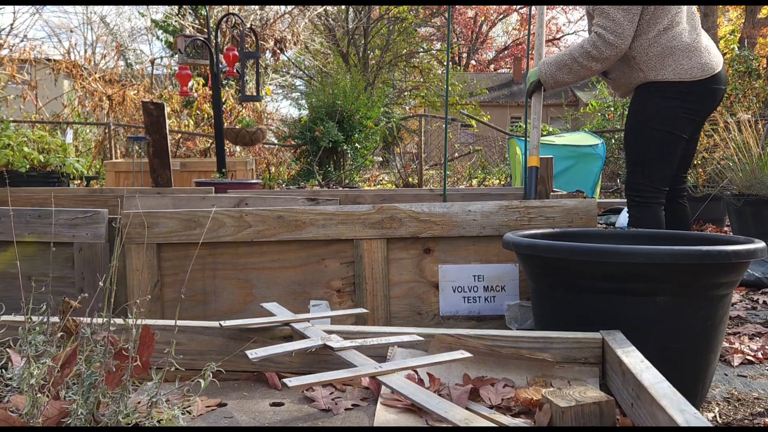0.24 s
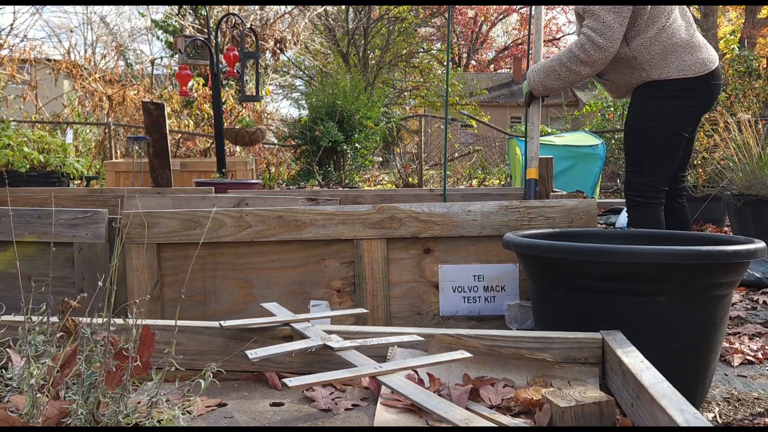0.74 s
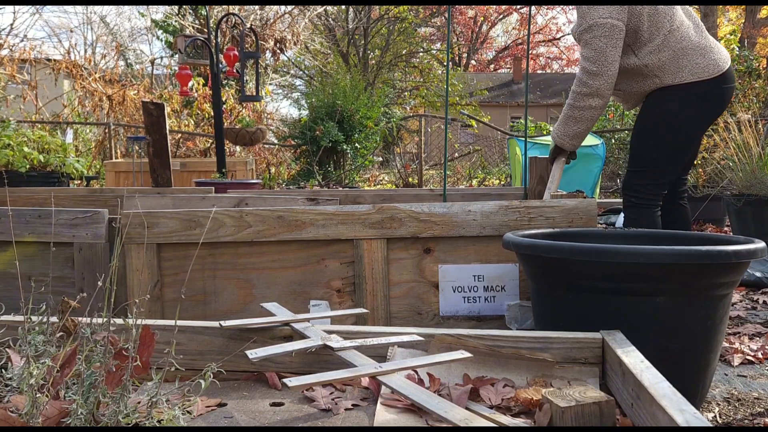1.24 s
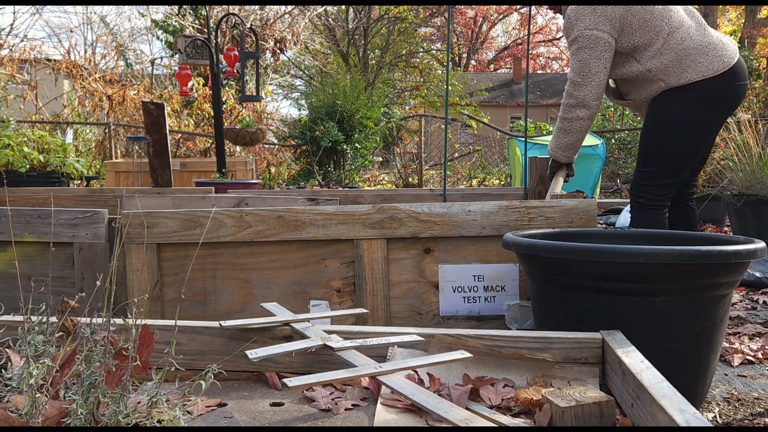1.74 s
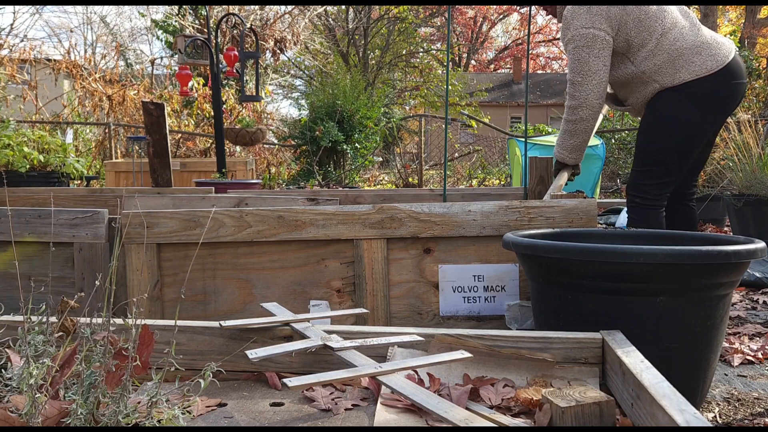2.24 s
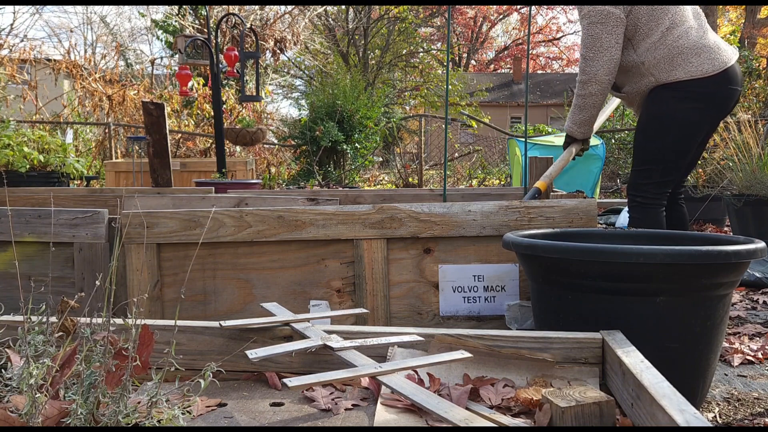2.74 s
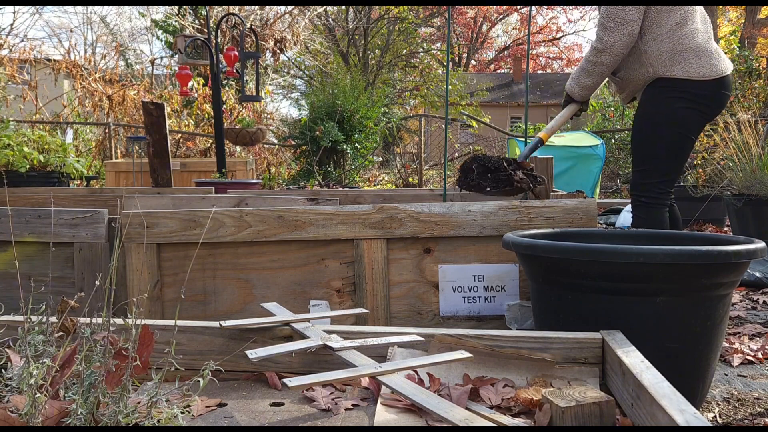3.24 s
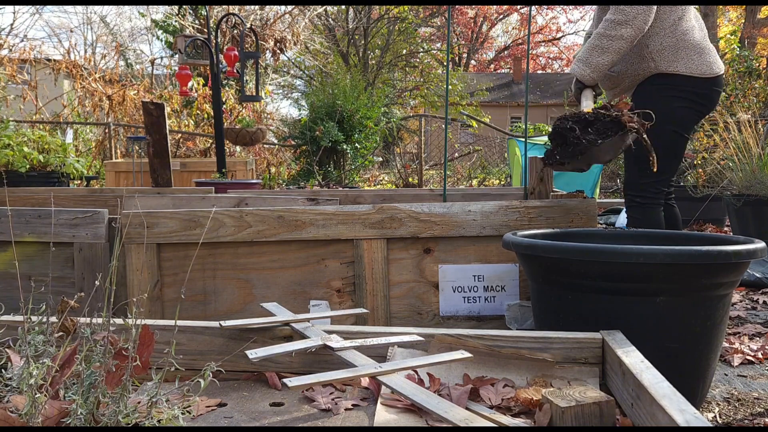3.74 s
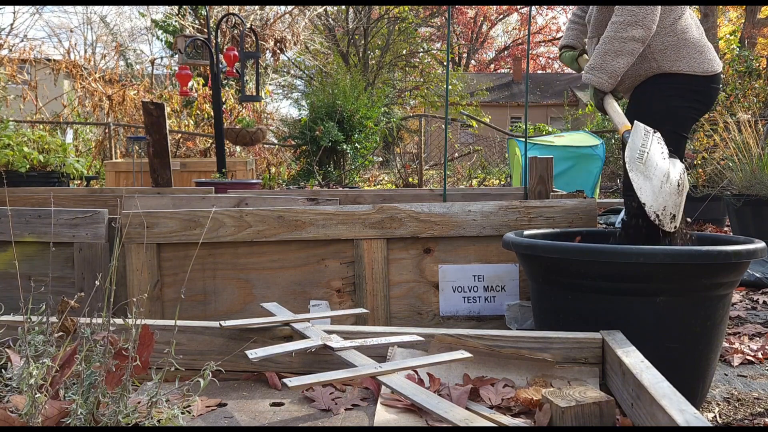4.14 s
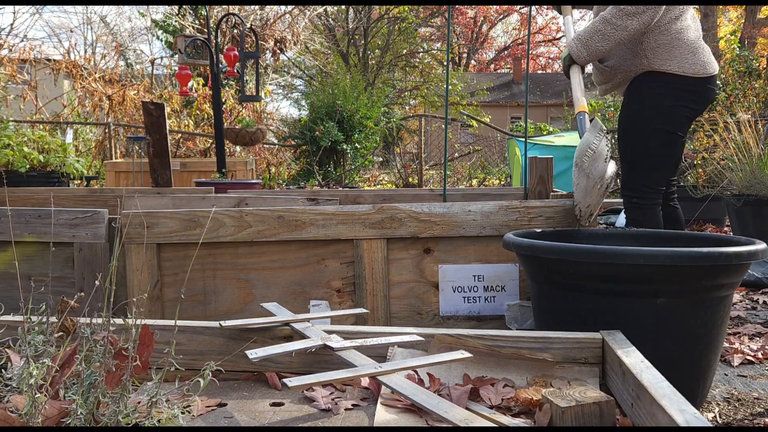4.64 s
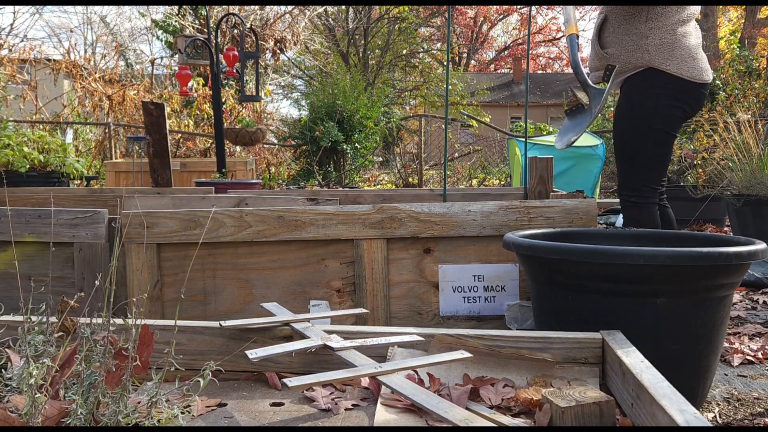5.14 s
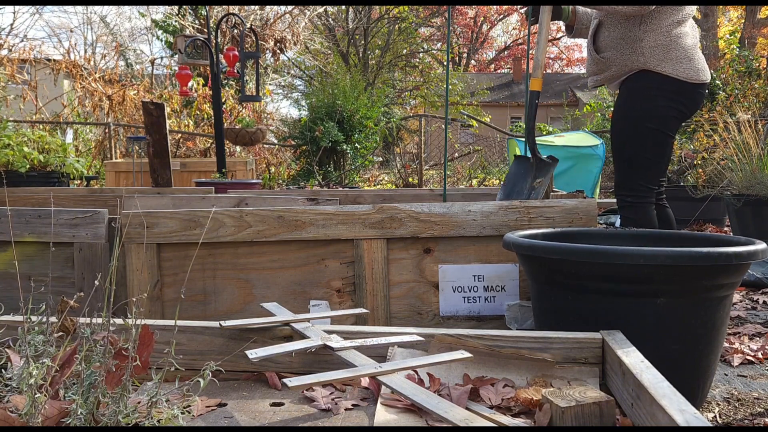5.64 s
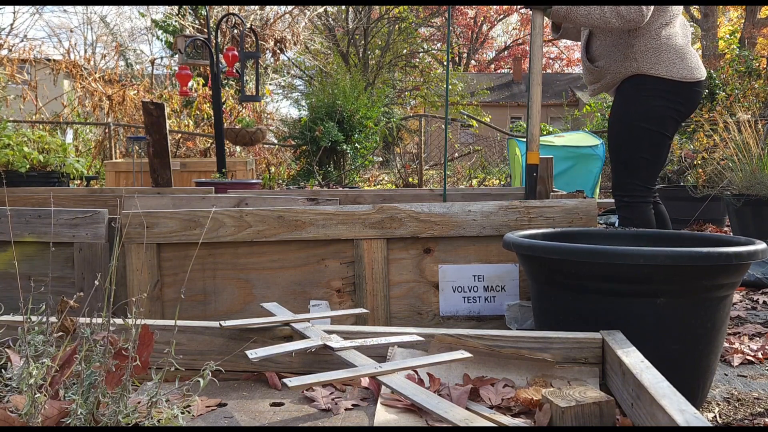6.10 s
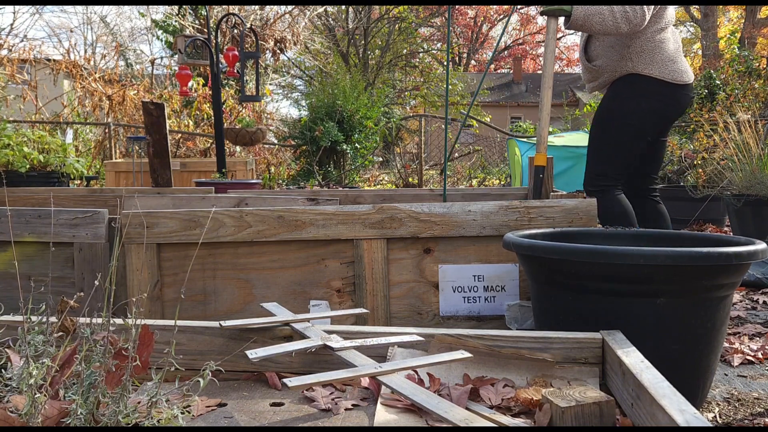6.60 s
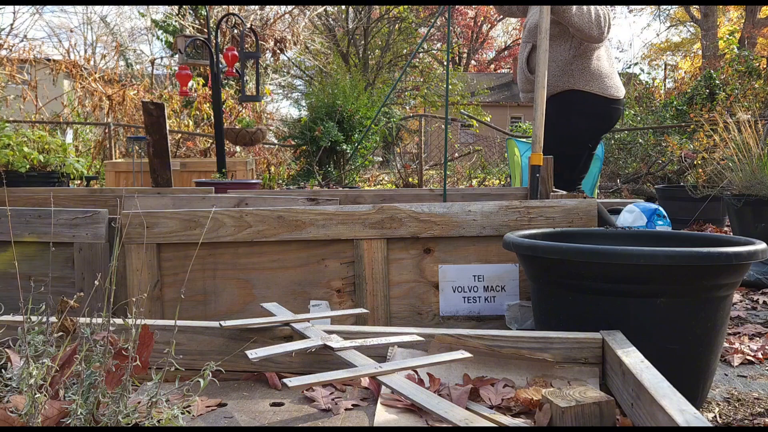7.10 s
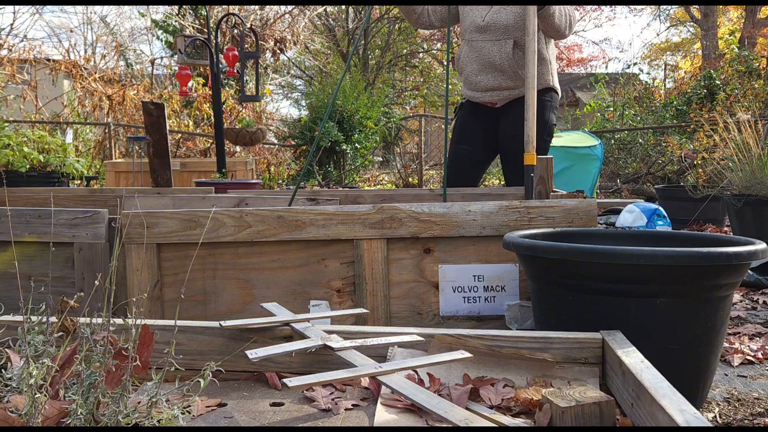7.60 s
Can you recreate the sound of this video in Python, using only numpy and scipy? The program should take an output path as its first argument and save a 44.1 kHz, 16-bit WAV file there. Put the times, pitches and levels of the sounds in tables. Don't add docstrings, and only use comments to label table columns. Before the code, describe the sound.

A shovel knocks wooden planks, thuds hard in soil, tips dirt into a plastic pot, rings twice on its rim, then leaves crunch.

```python
import sys
import numpy as np
from scipy import signal
from scipy.fft import rfft, irfft, next_fast_len
from scipy.io import wavfile
from scipy.ndimage import uniform_filter1d

SR = 44100
rng = np.random.default_rng(int(sys.argv[2]) if len(sys.argv) > 2 else 0)


def voltage_ratio(decibels):
    exponent = np.asarray(decibels, float) / 20
    return 10 ** exponent


def pcm_store(signal):
    levels = np.round(np.clip(np.atleast_2d(signal), -1, 1) * 32767)
    wavfile.write(sys.argv[1], SR, levels.astype(np.int16).T)


N = 346626

# hz, level_db, t60_s
PLANK_MODES = [(169, -12, 0.11), (244, 7.5, 0.19), (337.6, 7, 0.17), (415, 3, 0.047), (505, 3, 0.072),
               (650, 2, 0.1), (728, -16, 0.15), (894, -8, 0.08), (954, -7.5, 0.056), (1270, -11, 0.011),
               (1250, -28, 0.056), (1517, -30, 0.089), (1880, -17, 0.1)]
# start_s, peak_db, brightness_db_per_octave, pitch_factor
KNOCKS = [(0.0382, -33.5, -1.5, 1.0), (0.2685, -17, 2, 1.02), (0.3621, -27.5, -4, 1.03),
          (0.4153, -35, 5, 0.97), (0.469, -44, 0, 0.94), (0.63, -43, -1, 0.56), (0.757, -42.5, 3, 1.56),
          (1.9858, -25, -3, 1.1), (4.612, -25.5, 2, 1.06), (5.893, -39, 12, 0.87), (7.809, -38, 2, 1.07)]
RING_FACTOR, RING_LOSS_PER_DB = 0.89, 0.032
BLOW_S, BLOW_REF_DB, STIFFEN = 0.007, -19, 0.25
SOIL_DB, JOLT = -7, 2.5

# start_s, level_db, pitch_hz, contact_s, onset_softness
THUDS = [
    (2.2757, -19, 109, 0.023, .99),
    (2.277, -31, 260, 0.009, 1),
    (4.6168, -20, 114, 0.013, .99),
    (1.5, -48, 105.7, 0.018, 0.61),
    (.2695, -31, 280, 0.024, 0.52),
    (.3615, -26.5, 303, 0.034, 0.19),
]
# start_s, level_db, pitch_hz, contact_s, onset_softness
SLAM = (1.9866, -6.3, 114, .0187, .52)
# start_s, level_db, pitch_hz, length_s, onset_softness
CHIRP = (.917, -52, 7400, .024, 1)
# hz, level_db, t60_s
SLAM_RING = [(332, -12.5, .055), (496, -18, .037), (650, -17.5, .03)]
# hz, peak_db, t60_s
SLAM_CRACKS = [(740, -39, 0.023), (1100, -31.5, 0.037), (1500, -41, 0.04), (2060, -40.5, 0.05),
               (4500, -46, 0.036), (7700, -37.5, 0.023)]
CONTACT_S = .001

# start_s, ring_db, crunch_db, crunch_s, rattle_db
BLOWS = [
    (4.6105, -29.5, -33, 0.014, -47),
    (4.8187, -37, -39.5, 0.016, -60),
]
# delay_s, level_db
BOUNCES = [(.0088, -7), (.0119, -1)]
# hz, first_blow_db, second_blow_db, t60_s
BLADE_MODES = [(809, -9.5, -13, .55), (1373, -15, -40, .19), (1577, -13, -32, .42), (1846, -21, -19, .35),
               (2015, -17, -9, .4), (2433, -14, -36, .27), (2511, -9.5, -30, .36), (10400, -31, -50, .25),
               (1450, -4, -32, 0.039), (1530, -8, -36, 0.04), (1690, -10, -6, 0.045), (2060, -11, -9, 0.06),
              (2210, -16, -3, 0.036), (2700, -15, -20, 0.06), (2826, -24, -28, 0.23),
              (3435, -26, -26, 0.24), (3800, -28, -22, 0.08), (4830, -27, -24, 0.05),
              (6300, -26, -19, 0.05), (7300, -17, -22, .09), (11780, -35, -40, .2), (13140, -32, -40, .06)]
# from_hz, to_hz, first_blow_db, second_blow_db, t60_s
BLADE_CROWD = (1305, 2905, -31, -44, 0.2)
# hz, density_db_per_hz
CRUNCH_TONES = [
    [(530, -38), (900, -13), (1120, -28), (1470, -6.5), (2120, -8), (2540, -11), (3040, -22), (5160, -13.5),
     (6250, -15), (7230, -11), (8450, -24.5), (13200, -24.5), (16000, -24)],
    [(710, -38), (1300, -40), (2150, -9), (3590, -8), (4960, -1.5), (7410, -4), (8170, -19), (9510, -18),
     (10300, -42), (11200, -30), (16000, -32)],
]
CLICK, GRIND, GRIND_S = 9, .05, .045
DAMP_S, DAMP_DB = .12, -7

# hold_start_s, level_db, attack_s, hold_s, release_s
SHAKE = [(.425, -45, 0.028, 0.067, 0.046), (.64, -49.5, 0.023, 0.021, 0.091), (.76, -56.5, .03, 0.022, .15)]
SLIDE = [(2.255, -50.5, .1, 0.13, 0.092)]
SPRAY = [(4.18, -56.5, .016, .008, 0.05), (4.225, -58, 0.044, 0.072, 0.064)]
CLODS = [(4.21, -51.5, .06, .04, 0.087), (4.285, -54.5, .04, .05, 0.057)]
# hz, density_db_per_hz
SHAKE_TONE = [(120, -35), (200, -14), (330, 9.5), (500, -6.5), (800, -7.5), (1100, -27), (1600, -22),
              (2500, -49), (5000, -90)]
SLIDE_TONE = [(240, -16), (400, -4), (579, -2.5), (742, -10), (1310, -11), (2090, -16), (3260, -11),
              (5250, -11.5), (5650, -2.5), (6100, -16), (7250, -7), (8370, -17), (15300, -22.5),
              (16000, -28)]
SPRAY_TONE = [(4120, -28), (7000, 1), (7530, 0), (9790, -23), (10400, -14), (12900, -2), (15000, -5),
              (16000, -21)]
POT_TONE = [(180, -37), (300, -8), (332, -26), (569, -3.5), (758, -9.5), (1530, -11.5), (1670, -22),
            (2090, -12.5), (3210, -20), (6000, -14), (7800, -40), (13200, -120)]
EDGE_DB = -15

# peak_s, fizz_db, crunch_db, attack_s, release_s
STEPS = [(.474, -73, -66, .3, 0.091), (.93, -59, -59, 0.03, 0.077), (1.24, -68.5, -82, 0.14, 0.18),
         (5.86, -72, -60.5, 0.081, 0.062), (5.99, -68, -58.5, 0.15, .08), (6.15, -81, -59, 0.16, 0.29),
         (6.76, -68, -56, 0.39, 0.25), (6.92, -66.5, -57, 0.14, 0.15), (7.06, -77, -59.5, 0.046, 0.081),
         (7.19, -68, -59, .15, 0.08), (7.31, -84, -55.5, 0.024, 0.34), (7.48, -60, -49.5, 0.29, 0.13),
         (7.675, -62.5, -56, .12, 0.077), (7.83, -68, -64, 0.045, 0.033)]
# hz, density_db_per_hz
LEAF_TONE = [(150, -37), (250, -5), (369, 2), (470, -1), (518, -2.5), (716, -8.5), (991, -12), (1370, -6.5),
             (1580, -21), (2160, -8), (2930, -17), (4400, -14), (7380, -12.5), (8400, -27), (12000, -29),
             (15600, -64), (22000, -120)]
TREAD_S = .03
# start_s, peak_db, pitch_hz
SNAPS = [(0.039, -45, 1270), (.27, -50, 1970), (.365, -46, 1380), (.37, -45, 950), (.416, -50, 1500),
         (.416, -52, 800), (0.956, -45, 2500), (.956, -37, 6600), (4.170, -52, 12000), (4.1795, -36, 11900),
         (4.19, -50, 13500), (4.2157, -50, 12500), (4.2326, -38, 13000), (4.258, -50, 12000),
         (4.274, -52, 12500), (4.3698, -53, 12000), (4.179, -51, 900), (4.214, -44, 1210),
         (4.219, -44, 650), (4.235, -47, 900), (4.281, -48, 1100), (4.31, -49, 1100), (4.326, -53, 1100),
         (4.376, -47, 1100), (4.819, -41, 14500), (4.819, -47, 11500), (4.829, -55, 13000),
         (5.895, -45, 1590), (6.139, -49.5, 1370), (6.765, -42, 6710), (7.05, -53, 10000),
         (7.2968, -38, 5260), (7.296, -47, 990), (7.349, -48, 1090), (7.353, -49, 600), (7.378, -47, 600),
         (7.388, -44, 3000), (7.396, -39, 6500), (7.395, -46, 1000), (7.4145, -42, 6450),
         (7.415, -49, 1000), (7.431, -38, 5200), (7.44, -56, 1400), (7.454, -35, 6500), (7.465, -37, 2150),
         (7.465, -44, 1100), (7.483, -33.5, 5000), (7.491, -40, 990), (7.492, -39, 4700),
         (7.506, -41, 5000), (7.514, -46, 1000), (7.516, -39, 4700), (7.518, -40, 10000),
         (7.655, -50, 5050), (7.806, -42, 2800), (7.805, -39.5, 1010)]
SNAP_T60_S, SNAP_T60_CYCLES = .006, 36
POT_START_S, POT_END_S, WALK_S = 4.0, 5.0, 6.5
POT_WET_DB = -8

# time_s, level_db
HUM = [(0, -48), (.35, -35), (.72, -41), (1, -54), (2.6, -49.5), (3.3, -41), (5.3, -38), (5.95, -41),
       (6.5, -45.5), (7.2, -48), (7.86, -45.5)]
HUM_HZ, SAG_HZ_PER_S = 102.3, .9
# hz, level_db, width_hz
FAINT_HUMS = [(70.87, -46, 3.6), (131.9, -56, 2.9), (183.5, -59, 5.3)]

# hz, density_db_per_hz
TRAFFIC_TONE = [(12, -31), (20, -25), (43, -6), (58, 3.5), (81, -6.5), (102, -0.5), (166, -13),
                (189, -15.5), (211, -22.5), (244, -21.5), (295, -26.5), (381, -21), (426, -31), (687, -31),
                (900, -55), (1170, -80), (1980, -120)]
# time_s, rumble_db
SWELL = [(0, -38.5), (1.6, -40.5), (2.1, -39), (2.65, -42), (4.0, -40), (4.55, -39.5), (6.15, -42),
         (7.86, -41.5)]
DEEP_DB, DEEP_DB_PER_S = 6.5, -1.5
# hz, density_db_per_hz
HISS_TONE = [(470, -11.5), (800, -0.5), (942, -2.5), (1020, -3), (1140, -5), (2150, -5), (2840, -8),
             (4630, -7.5), (5110, -10), (6820, -12.5), (7360, -8.5), (8990, -22), (10200, -27),
             (15000, -26), (16000, -33)]
HISS_DB = -56
# hz, all_round_likeness, far_left_likeness
LIKENESS = [(30, 0.87, .03), (60, 1, 0.046), (131, 0.99, 0.038), (250, 0.83, 0.075), (400, 0.62, 0.48),
            (820, 0.23, 0.72), (1500, 0.0079, 0.36), (3000, .01, 0.032), (6000, 0.0092, 0.042),
            (12000, .01, .02)]
LEFT_LEAD_S = 21.3 / 44100
# hz, left_minus_right_db
PORTS = [(60, .6), (300, .3), (1500, 1.5), (3000, 1.2), (6000, -1), (8200, -2), (9600, 6.5), (12000, 3.5),
         (15000, 3.2)]
EDGE_HZ = 15830


def evened(x):
    return x / np.sqrt(np.mean(x ** 2) + 1e-20)


def read(points, hz, column=1):
    table = np.transpose(points)
    return np.interp(np.log(hz + 1), np.log(table[0] + 1), table[column])


def add(mix, start_s, sound):
    part = mix[round(start_s * SR):][:len(sound)]
    part += sound[:len(part)]


def colour(x, spectrum):
    size = next_fast_len(len(x) + 2048)
    gain = voltage_ratio(read(spectrum, np.fft.rfftfreq(size, 1 / SR)))
    return irfft(rfft(x, size) * gain, size)[:len(x)]


def ring(force, hz, t60_s):
    t = np.arange(round(min(t60_s, .6) * SR)) / SR
    return signal.oaconvolve(force, voltage_ratio(-60 * t / t60_s) * np.sin(2 * np.pi * hz * t))


def knock(peak_db, bright_db, ring_factor, pitch, blow_s):
    u = np.arange(round(.06 * SR)) / SR / blow_s
    jolts = uniform_filter1d(rng.standard_normal(len(u)), size=16)
    blow = (1 - np.exp(-u * 15)) * np.exp(-u * 1.7) * jolts + JOLT * np.exp(-u * 40)
    modes = [(hz * pitch, db + bright_db * np.log2(hz / 300), t60_s * ring_factor)
             for hz, db, t60_s in PLANK_MODES]
    soil_tone = [(100, -40, 0)] + modes + [(3000, -71, 0)]
    soil = evened(colour(rng.standard_normal(len(u)), soil_tone))
    out = np.zeros(SR // 4)
    add(out, 0, voltage_ratio(SOIL_DB) * soil * (1 - np.exp(-u * 8)) * np.exp(-u * 0.19))
    for hz, db, t60_s in modes:
        swing = ring(blow, hz, t60_s)
        add(out, 0, voltage_ratio(db) * swing / abs(swing).max())
    return voltage_ratio(peak_db) * out / abs(out).max()


def thud(level_db, hz, contact_s, softness):
    t = np.arange(0, contact_s, 1 / SR)
    press = np.sin(np.pi * (t / contact_s) ** softness) ** 2
    return voltage_ratio(level_db) * press * np.sin(2 * np.pi * hz * t)


def slam():
    contact = signal.windows.hann(round(CONTACT_S * SR))
    out = np.zeros(SR // 8)
    add(out, CONTACT_S / 2, -thud(*SLAM[1:]))
    for hz, db, t60_s in SLAM_RING:
        add(out, 0, voltage_ratio(db) * ring(contact / contact.sum(), hz, t60_s))
    return SLAM[0] - CONTACT_S / 2, out


def clang(which, ring_db, crunch_db, crunch_s, rattle_db, bounce_s, bounce_db):
    t = np.arange(SR // 4) / SR
    grit = evened(colour(rng.standard_normal(len(t)), CRUNCH_TONES[which]))
    out = np.zeros(SR)
    crunch = voltage_ratio(crunch_db - 150 * t) / (1 + (t / crunch_s) ** 8)
    rattle = voltage_ratio(rattle_db - 60 * t) / (1 + (t / .125) ** 8)
    add(out, 0, grit * (crunch + rattle))
    scrape = .5 * np.exp(-t / 0.0017) + GRIND * np.exp(-t / GRIND_S)
    contact = rng.standard_normal(len(t)) * scrape + CLICK * (t == 0)
    force = contact + voltage_ratio(bounce_db) * np.roll(contact, round(bounce_s * SR))
    crowd = [(hz, *BLADE_CROWD[2:]) for hz in rng.uniform(*BLADE_CROWD[:2], size=24)]
    for hz, *db, t60_s in BLADE_MODES + crowd:
        swing = ring(force, hz, t60_s)
        damping = np.clip((np.arange(len(swing)) / SR - DAMP_S) / .03, 0, 1)
        add(out, 0, voltage_ratio(ring_db + db[which] + DAMP_DB * damping) * swing / abs(swing).max())
    return out


def stroke(hold_start_s, level_db, attack_s, hold_s, release_s):
    hold_end_s = hold_start_s + hold_s
    return [(hold_start_s - attack_s, level_db + EDGE_DB), (hold_start_s, level_db),
            (hold_end_s, level_db), (hold_end_s + release_s, level_db + EDGE_DB)]


def rustle(corners, tone, grains_per_s, spread_db, smooth):
    s, db = np.transpose(corners)[:2]
    t = np.arange(s[0], s[-1], 1 / SR)[:SR // 2]
    grains = np.zeros(len(t))
    for hz in np.geomspace(300, 14000, num=10):
        hits = rng.random(len(t)) < grains_per_s / 10 / SR
        sizes = voltage_ratio(spread_db * np.minimum(rng.exponential(1, len(t)), 4))
        puffs = signal.lfilter([1], [1, -.991], sizes * hits)
        band = signal.lfilter(*signal.iirpeak(hz, 2.2, SR), puffs * rng.standard_normal(len(t)))
        grains += np.sqrt(hz) * evened(band)
    friction = smooth * rng.standard_normal(len(t))
    sound = evened(colour(evened(grains) + friction, tone))
    return s[0], voltage_ratio(np.interp(t, s, db)) * sound * signal.windows.tukey(len(t), .1)


def footfall(peak_s, fizz_db, crunch_db, attack_s, release_s):
    fizz_tone = [(200, -40), (3000, -16), (8000, -2), (14000, -6.5), (16000, -2.5)]
    timing = attack_s, TREAD_S, release_s
    start_s, fizz = rustle(stroke(peak_s, fizz_db, *timing), fizz_tone, 2500, 7.1, 1.0)
    crunch = rustle(stroke(peak_s, crunch_db, *timing), LEAF_TONE, 900, 2.0, 1.0)[1]
    return start_s, fizz + crunch


def snap(peak_db, hz, t60_s):
    n = np.arange(1500)
    puff = (rng.standard_normal(1500) + 8 * (n == 0)) * voltage_ratio(-60 * n / SR / t60_s)
    dull = signal.iirpeak(min(hz, 15000), 2.4, SR)
    out = signal.lfilter(*dull, signal.lfilter(*dull, puff))
    return voltage_ratio(peak_db) * out / abs(out).max()


def fences(x, lag_samples, wet_db, t60_s):
    t = np.arange(SR // 8) / SR
    signs = rng.choice([-1., 1.], (2, len(t)))
    hits = rng.random((2, len(t))) < 4000 / SR
    taps = signs * hits * voltage_ratio(-60 * t / t60_s) * (t > .001)
    taps = signal.sosfilt(signal.butter(2, 1100, "high", fs=SR, output="sos"), taps)
    taps *= voltage_ratio(wet_db) / np.linalg.norm(taps, axis=1, keepdims=True)
    taps[[0, 1], [lag_samples, 0]] += 1
    return signal.oaconvolve(x[None], taps, axes=1)[:, :N]


def engines():
    t = np.arange(N) / SR
    level = np.sqrt(2) * voltage_ratio(np.interp(t, *np.transpose(HUM)))
    out = level * np.sin(2 * np.pi * np.cumsum(HUM_HZ - SAG_HZ_PER_S * t) / SR)
    for hz, db, width_hz in FAINT_HUMS:
        pole = np.exp(-np.pi * width_hz / SR)
        drift = signal.lfilter([1], [1, -pole], rng.standard_normal((2, N)))
        phase = 2 * np.pi * hz * t
        out += voltage_ratio(db) * evened(drift[0] * np.sin(phase) + drift[1] * np.cos(phase))
    return np.array([out, np.roll(out, round(.0003 * SR))])


def yard(patchy_db=1.0):
    frames, hz = N // 512 + 5, np.fft.rfftfreq(2048, 1 / SR)
    a, b, c, d, patches = rng.standard_normal((frames, len(hz), 5)).T
    patches = uniform_filter1d(uniform_filter1d(patches, size=20, axis=0), size=8, axis=1)
    patches = evened(patches)
    lead = np.exp(-2j * np.pi * hz * LEFT_LEAD_S)
    same = read(LIKENESS, hz) + read(LIKENESS, hz, column=2) * lead
    same = (same / np.maximum(abs(same), 1))[:, None]
    left = a + 1j * b
    right = same * left + np.sqrt(np.clip(1 - abs(same) ** 2, 0, 1)) * (c + 1j * d)
    spectra = np.array([left, right]) * voltage_ratio(patchy_db * patches)

    def sounded(gain):
        return evened(signal.istft(spectra * gain, nperseg=2048, noverlap=1536)[1][:, :N])

    deep_db = DEEP_DB + DEEP_DB_PER_S * np.arange(frames) * 512 / SR
    deep_db = deep_db / (1 + (hz[:, None] / 60) ** 4)
    rumble = sounded(voltage_ratio(read(TRAFFIC_TONE, hz)[:, None] + deep_db))
    hiss = sounded(voltage_ratio(read(HISS_TONE, hz))[:, None])
    swell_db = np.interp(np.arange(N) / SR, *np.transpose(SWELL))
    return voltage_ratio(swell_db) * rumble + voltage_ratio(HISS_DB) * hiss


def scene():
    out = yard() + engines()
    bed, pot, path = np.zeros((3, N))

    def place(s):
        if POT_START_S < s < POT_END_S:
            return pot
        return path if s > WALK_S else bed

    for s, db, bright_db, pitch in KNOCKS:
        ring_factor = RING_FACTOR - RING_LOSS_PER_DB * bright_db
        blow_s = BLOW_S * voltage_ratio(STIFFEN * (BLOW_REF_DB - db))
        add(bed, s, knock(db, bright_db, ring_factor, pitch, blow_s))
    for s, *row in THUDS + [CHIRP]:
        add(bed, s, thud(*row))
    add(bed, *slam())
    for hz, db, t60_s in SLAM_CRACKS:
        add(bed, SLAM[0], snap(db, hz, t60_s))
    for which, (s, *row) in enumerate(BLOWS):
        add(pot, s, clang(which, *row, *BOUNCES[which]))
    # strokes, tone, grains_per_s, spread_db, smooth
    for rows, *grain in [(SHAKE, SHAKE_TONE, 600, 2.9, 1.5), (SLIDE, SLIDE_TONE, 3000, 3.0, 1.2),
                         (SPRAY, SPRAY_TONE, 3000, 3.0, 1.1), (CLODS, POT_TONE, 550, 2.4, .9)]:
        for row in rows:
            add(place(row[0]), *rustle(stroke(*row), *grain))
    for row in STEPS:
        add(place(row[0]), *footfall(*row))
    for s, db, hz in SNAPS:
        add(place(s), s, snap(db, hz, SNAP_T60_S + SNAP_T60_CYCLES / hz))
    out += fences(bed, lag_samples=2, wet_db=-2.5, t60_s=0.04)
    out += fences(pot, lag_samples=4, wet_db=POT_WET_DB, t60_s=0.03)
    out += fences(path, lag_samples=1, wet_db=-5.5, t60_s=0.04)
    return out


def top_cut(x):
    return signal.sosfilt(signal.butter(12, 15830, fs=SR, output="sos"), x)


def record(dry):
    ports = np.array([colour(dry[k], [(hz, db * (.5 - k)) for hz, db in PORTS]) for k in range(2)])
    lowpass = signal.firwin(511, EDGE_HZ, window=("kaiser", 9), fs=SR)
    ports = signal.oaconvolve(ports, lowpass[None], "same")
    return top_cut(ports)


dry = scene()
out = record(dry)
pcm_store(out)
```